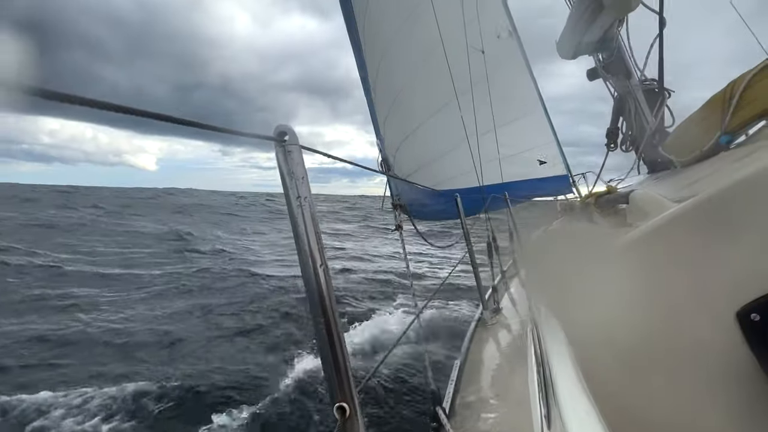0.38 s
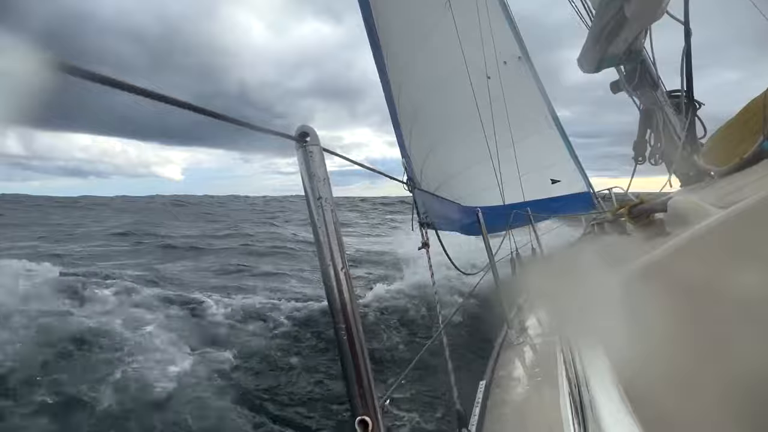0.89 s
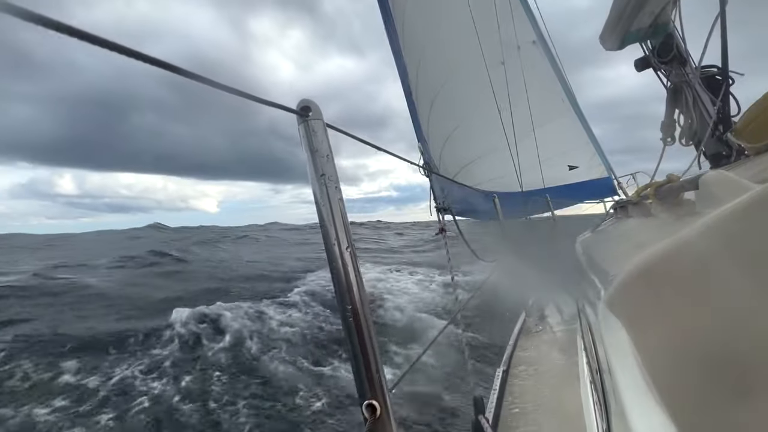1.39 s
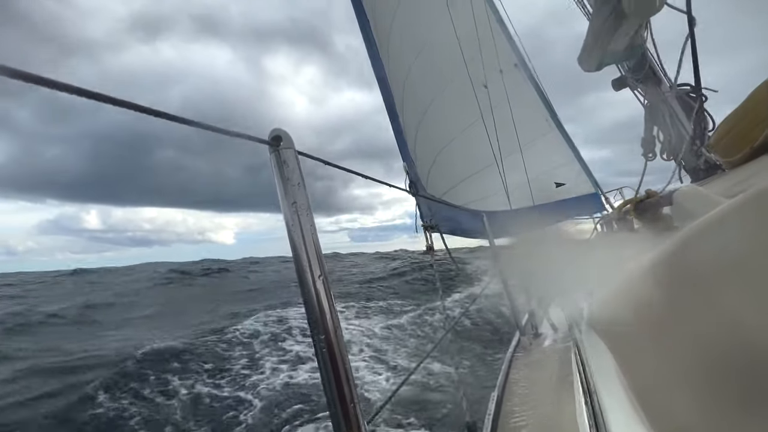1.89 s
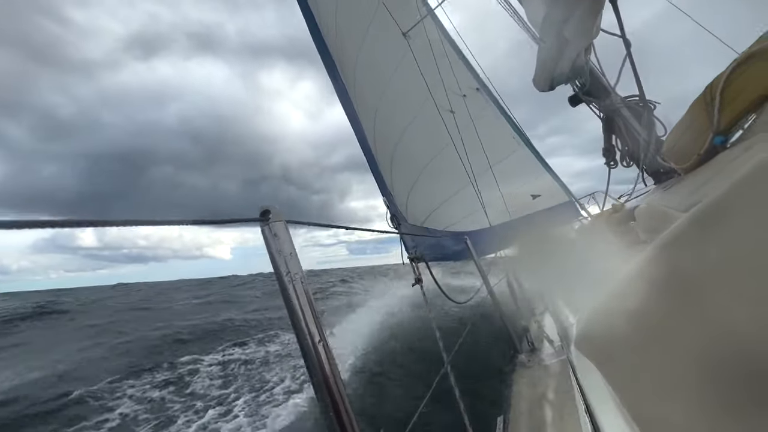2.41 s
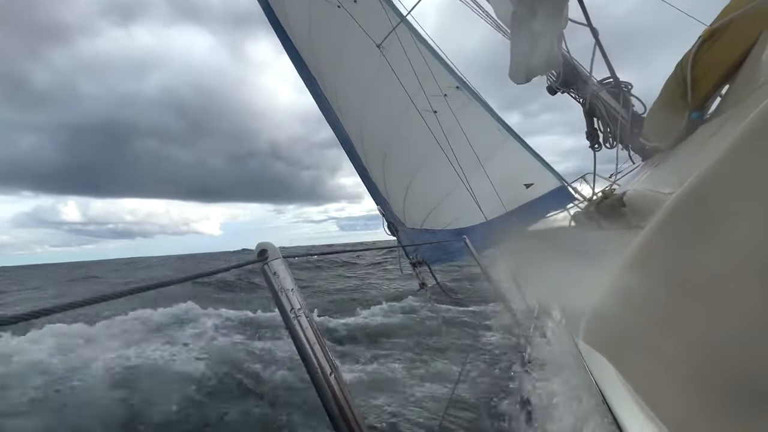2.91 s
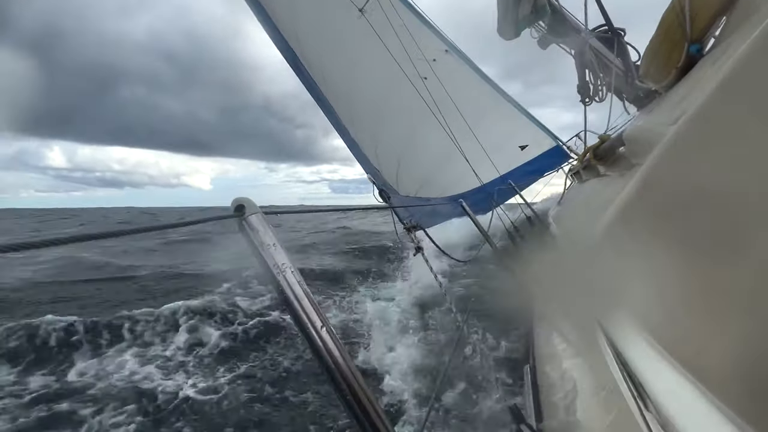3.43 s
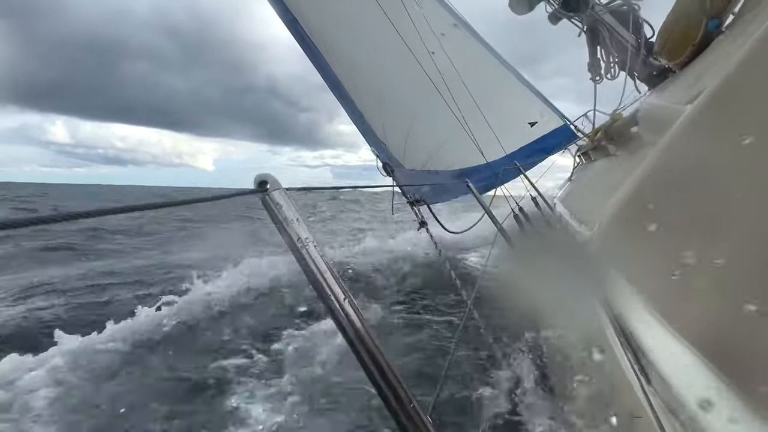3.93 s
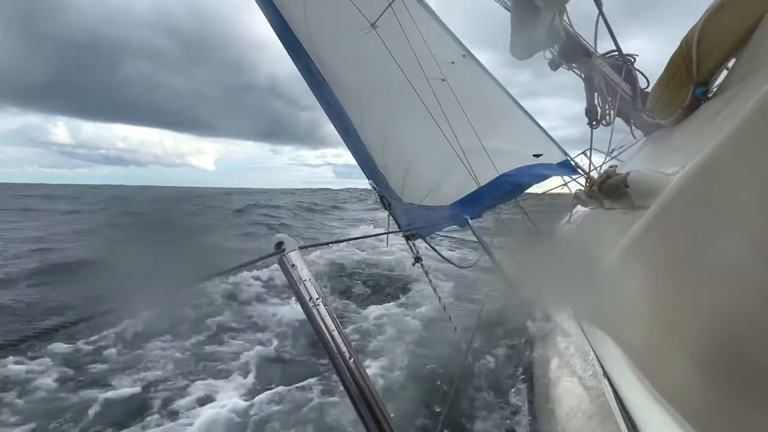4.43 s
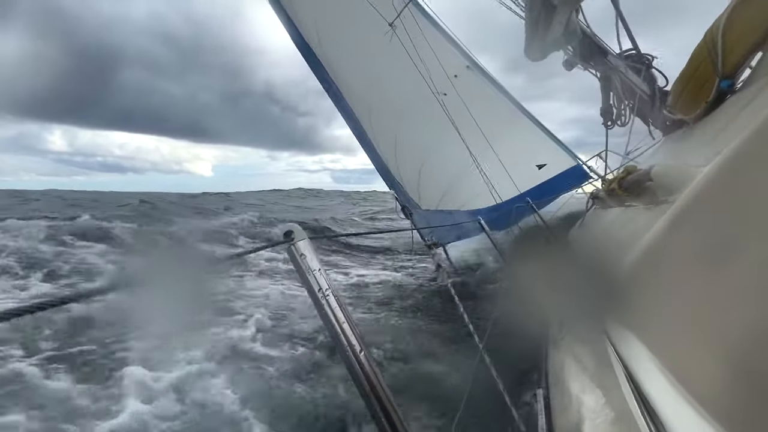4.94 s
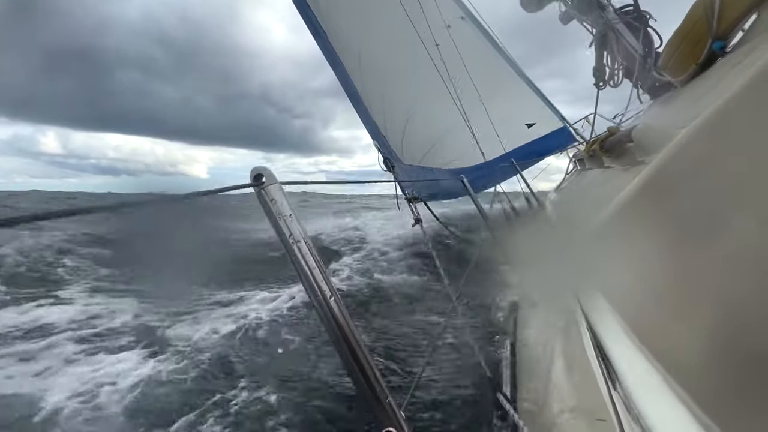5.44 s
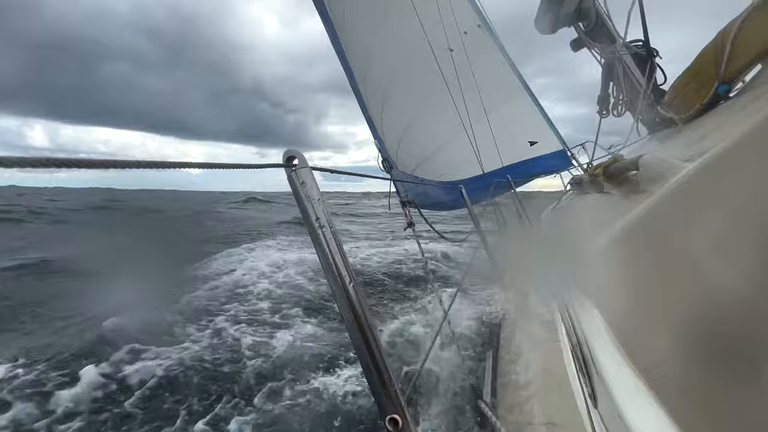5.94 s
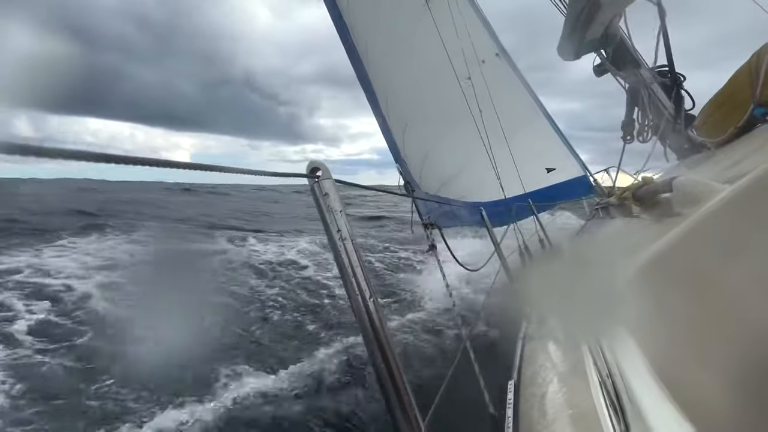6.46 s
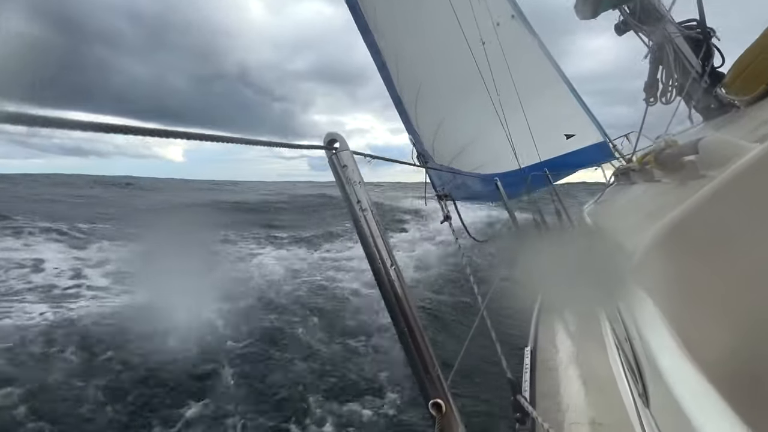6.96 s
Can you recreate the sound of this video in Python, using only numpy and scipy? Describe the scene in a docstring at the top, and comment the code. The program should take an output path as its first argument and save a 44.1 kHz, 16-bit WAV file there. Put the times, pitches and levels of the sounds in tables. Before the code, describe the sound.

A wet stereo microphone sits close at the rail of a small sailboat in rough seas. From 0 s, deep wind booms and flutters in uneven thumps over soft wash, with a couple of faint hollow taps at about 0.2 s. Water gurgles more from 0.7 to 1.3 s, then eases; small ticks and more taps appear near 1.8 s. From 2.4 s the hull wash swells. A tiny high peep at 2.9 s precedes a spatter of spray, knocks and plops at 3.0-3.2 s. Rushing, hissing water peaks at 3.5 s. At 3.8-4.05 s a heavy splash crackles and gulps, then muffles wind and sea until about 4.3 s. Wash returns with a few drops. At 5.2 s a sharp ping starts a thin wavering whistle lasting half a second. The water quiets around 5.6 s, then rushes again under thumping gusts, with light drops near 6.15 s, until 7.1 s.

```python
"""At the rail of a small sailboat heeling through rough seas, a wet microphone with two ports listens close.
Wind noise booms and flutters over the ports; bands of noise and ringing bubbles make the water along the hull.
Spray drops are bursts of dying noise, with a knock of the case and a plop that falls in pitch.
A splash floods the ports for a moment, muffling wind and sea, and wavering tones whistle in a wet port.
Large bubbles gulp as rising tones, and a few hollow taps ring near 2 kHz."""
import sys
import numpy as np
from scipy import signal
from scipy.io import wavfile
from scipy.ndimage import uniform_filter1d, minimum_filter1d

SR = 44100
rng = np.random.default_rng(int(sys.argv[2]) if len(sys.argv) > 2 else 0)


def dump(signal):
    """Clip the signal to [-1, 1] and save it as 16-bit WAV at the path in sys.argv[1]."""
    limited = np.clip(np.atleast_2d(signal).T, -1, 1)
    pcm = np.round(limited * 32767).astype(np.int16)
    wavfile.write(sys.argv[1], SR, pcm)


def volts(x):
    """Linear amplitude factor 10**(x/20) for a level x in dB, scalar or array-like."""
    e = np.asarray(x, float) / 20
    return 10 ** e


N = 312634

# Wind pressure on the ports between heavy eddies. Each row: time in seconds, boom in dB, flutter in dB.
WIND_LEVELS = [(0.0, -18.5, -29), (0.45, -19, -27), (0.9, -23, -27), (1.2, -21, -27), (1.34, -27.5, -32),
               (1.46, -16, -23.5), (2.1, -24.5, -31.5), (2.33, -24, -33.5), (2.5, -14.5, -21),
               (3.0, -21, -28.5), (3.5, -14, -21), (3.68, -19, -26), (3.82, -3, -18.5), (3.86, -13.5, -17),
               (3.93, -21.5, -25.5), (4.5, -17, -23.5), (4.9, -18.5, -24.5), (5.09, -24.5, -29.5),
               (5.22, -12.5, -22), (5.35, -28, -29), (5.5, -21, -26), (5.8, -27, -29.5), (6.4, -24, -27.5),
               (7.09, -15, -23)]
# Heavy eddies thumping the ports. Each row: middle in seconds, boom lift in dB, flutter lift in dB,
# half length in seconds.
WIND_THUMPS = [(0.31, 10, 4.5, 0.031), (0.43, 6, 0.5, 0.14), (0.6, 9.5, -1, 0.04), (0.69, 10.5, 7.5, 0.078),
               (0.79, 6, 2, 0.053), (1.0, 9.5, -1, 0.023), (1.14, 6.5, 6.5, 0.04), (1.23, 8.5, 0, 0.031),
               (1.53, 3.5, 4, 0.031), (1.78, 9.5, 9.5, 0.041), (1.87, 6.5, 1, 0.023),
               (1.95, 10.5, 10, 0.057), (2.07, 7, -2, 0.084), (2.23, 8.5, 10.5, 0.15),
               (2.41, 6, 3.5, 0.078), (2.49, 4.5, 5.5, 0.06), (2.64, 6, 1, 0.057), (2.76, 5, 2, 0.067),
               (2.92, 10.5, 8.5, 0.064), (3.06, 9.5, 3, 0.044), (3.14, 15.5, 18, 0.01), (3.23, 9, 2, 0.059),
               (3.41, 2.5, 5.5, .05), (3.49, 8, 2.5, 0.016), (3.57, 6.5, 6, 0.031), (3.63, 12, 8, 0.041),
               (3.74, -0.5, 10.5, 0.045), (3.99, 2, 5.5, 0.091), (4.36, 6, 6, 0.019),
               (4.46, 10, 3.5, 0.085), (4.69, 16, 10, 0.053), (4.82, 11.5, 9.5, 0.065), (4.88, 9, 9, 0.036),
               (4.98, 10.5, 3.5, 0.089), (5.42, 17.5, 8, 0.06), (5.85, 18.5, 5.5, 0.023),
               (6.03, 11, 5.5, 0.12), (6.2, 16.5, 9, 0.025), (6.29, 8.5, -1.5, .06), (6.65, 11.5, 3, 0.091),
               (6.73, -4, 4.5, 0.025), (6.84, 1, 1, 0.045)]
# Relative noise spectra of the wind. Each row: frequency in Hz, density in dB per Hz.
BOOM_SPECTRUM = [(33, -15), (40, 0), (48, 3), (62, 2.5), (90, -4), (150, -14.5)]
FLUTTER_SPECTRUM = [(110, -7), (140, 1), (200, -3.5), (280, -5.5), (400, -18)]

# Water along the hull. Each row: time in seconds, wash in dB, surge in dB, foam hiss in dB.
SEA_LEVELS = [(0.0, -43.5, -36, -47.5), (0.2, -37.5, -30, -47.5), (0.65, -34, -26.5, -44),
              (0.9, -31.5, -26.5, -38.5), (1.25, -34, -28, -45), (1.4, -37, -34, -42.5),
              (1.51, -41, -34.5, -46), (1.74, -38.5, -38, -47), (2.0, -34.5, -30, -43),
              (2.4, -33.5, -32, -41.5), (2.9, -27, -28, -40), (3.1, -25.5, -26, -36.5),
              (3.25, -24.5, -24.5, -36.5), (3.52, -20, -21, -31.5), (3.68, -25.5, -27.5, -36),
              (3.8, -27, -21, -36), (3.95, -27.5, -28, -42.5), (4.5, -27, -31, -40.5),
              (4.85, -26, -24.5, -36), (5.0, -33, -33, -44), (5.27, -31, -28.5, -40.5),
              (5.58, -37.5, -37.5, -46.5), (5.78, -35.5, -34.5, -48.5), (5.9, -31.5, -33, -42.5),
              (6.5, -28.5, -31, -41.5), (6.82, -34.5, -29, -39.5), (7.09, -30.5, -28.5, -37.5)]
# Waves slopping against the hull. Each row: middle in seconds, wash lift in dB, surge lift in dB,
# half length in seconds.
HULL_SLOPS = [(0.7, 1, 5, 0.13), (1.46, 5, 2, 0.013), (1.81, 4, 6.5, 0.034), (2.21, 5, 4.5, 0.079),
              (2.5, 2, 4.5, 0.31), (2.73, 3.5, 2, 0.022), (3.04, 3.5, 7, 0.025), (3.13, 7, 11.5, 0.018),
              (3.73, 1, 10, 0.035), (3.87, 5.5, 4, 0.1), (3.99, 4, 6.5, 0.038), (4.38, 3.5, 10, 0.1),
              (4.56, -3, 5, 0.16), (4.8, 2, -8, 0.036), (5.86, 3, 6, 0.086), (6.81, 6.5, 4.5, 0.023)]
# Relative noise spectra of the water. Each row: frequency in Hz, density in dB per Hz.
SURGE_SPECTRUM = [(240, -28), (310, -1), (400, -6.5), (550, -3), (750, -7.5), (1100, -21.5)]
WASH_SPECTRUM = [(600, -3), (850, -2.5), (1250, 1.5), (1700, -2), (2100, -8), (2500, -20.5), (3100, -25)]
FOAM_SPECTRUM = [(3000, -21), (4250, -11.5), (4900, 5), (6500, -13), (8500, -10.5), (10500, -39),
                 (12000, -64), (16500, -47)]
FIZZ_SPECTRUM = [(2150, -4), (2700, 3), (3400, 7.5), (3900, 4), (4400, -12)]
# Fizz of small bubbles, sinking during the flood. Each row: time in seconds, level in dB.
FIZZ_LEVELS = [(0.0, -61), (0.31, -51), (0.47, -46.5), (0.81, -41), (0.93, -42.5), (1.56, -50.5),
               (1.74, -52.5), (1.89, -49), (2.31, -46.5), (2.9, -40.5), (3.28, -36.5), (3.55, -36),
               (3.8, -35.5), (3.95, -37), (4.08, -59), (4.26, -47), (4.44, -41.5), (4.78, -39.5),
               (4.93, -44), (5.27, -47), (5.47, -49.5), (5.82, -49), (6.02, -43.5), (6.38, -46.5),
               (6.61, -41), (7.09, -41.5)]
# Large bubbles gulping in the wash. Each row: start in seconds, level in dB, starting pitch in Hz.
BUBBLE_GULPS = [(0.68, -17, 563), (1.249, -13, 574), (1.454, -21, 1400), (1.567, -23, 480),
                (1.648, -27, 850), (1.682, -26, 1380), (3.035, -9, 1280), (3.046, -12, 756),
                (3.441, -11, 1210), (3.595, -13, 660), (3.727, -14, 804), (3.89, 4.5, 351),
                (3.905, -8, 397), (3.906, -12, 1010), (3.967, -14, 780), (4.012, -6, 497),
                (4.655, -19, 360), (4.946, -22, 371), (5.475, -27, 355), (5.967, -13, 335),
                (6.468, -15, 950)]

# Spray striking the case. Each row: start in seconds, tick level in dB, knock level in dB, plop level in dB,
# treble slope in dB per octave, left over right in dB.
SPRAY_DROPS = [(1.2407, -44, -20, -26, -14, -6), (2.7227, -40, -30, -16, -15, -14),
               (2.9958, -11, -12, -9, -17, 3), (3.0242, -21, -18, -31, -4.5, 17.5),
               (3.035, -36, -10, -24, -20, 0), (3.0785, -26, -11, -20, -14, 0),
               (3.089, -26, -9.5, -12, -6, 1), (3.102, -26, -12, -18, -14, 3),
               (3.106, -25, -9.5, -14, -9, -1), (3.1119, -26, -14, -6, -19, 9),
               (3.1281, -10, -3, -6, -25, 1), (3.137, -29, -14, -0.5, -18, -6),
               (3.19, -23, -26, -19, -8, 6), (3.6636, -20, -14, 3, -13, -11),
               (3.726, -21, -23, -14, -7, -2), (3.827, -17, -8, -12, -6.5, 0),
               (3.8405, -18, -10, -26, -5, 1), (3.849, -11, -13, -15, -18, 0),
               (3.854, -16, -9, -15, -4, 6.5), (3.871, -14.5, -10, -24, -9, 7),
               (3.881, -18, -11, -22, -7, -6), (3.877, -20, -9, -9, -11, 0),
               (3.89, -32, -9, -4.5, -10, -10), (3.8941, -24, -12, -2.5, -7, 5),
               (3.904, -15, -1, -12, -3, 6), (3.9085, -21, -7, -3.5, -4.5, 11),
               (3.9162, -7, -10, 2.5, -20, -9), (3.93, -24, -9.5, -10, -14, 14),
               (3.9352, -22, -21, -5.5, -14, -8), (3.9442, -26, -23, -6, -13, 4),
               (3.9516, -14, -9, 6, -18, -9), (3.978, -26.5, -22, -15, -4, 16),
               (3.9903, -19, -8.5, -18, -17, -10), (3.998, -30, -17, -10, -8, 9),
               (4.017, -16, -13, -18, -12, 0), (4.0195, -20.5, -16, -11, -2, 9.5),
               (4.034, -11, -1.5, 5, -27, 10.5), (4.065, -21, -18, -6, -25, -1),
               (4.359, -33, -25, -20, -2, 0), (4.38, -17.5, -22, -24, -8, 14),
               (4.404, -29, -14, -8, -12, 4), (4.668, -23, -31, -12, -7, 3),
               (6.138, -31, -15.5, -34, -12, -7), (6.174, -28, -23, -32, -10, -1)]
# Hollow tick, crack and fine spray of a drop. Each row: low edge in Hz, high edge in Hz.
SPRAY_BANDS = [(1500, 2000), (2600, 4500), (7000, 13000)]
# Showers of fine droplets on the case. Each row: start in seconds, length in seconds, droplets per second,
# base level in dB.
DROPLET_SHOWERS = [(2.982, 0.19, 900, -22.5), (3.217, 0.6, 500, -26.5), (3.826, 0.17, 2200, -20.5),
                   (4.322, 0.092, 190, -16), (3.078, 0.07, 1600, -20), (3.87, 0.02, 4000, -18),
                   (3.997, .025, 900, -21)]
# Pitch factors of low, middle and high plops.
PLOP_PITCH_FACTORS = [.87, 1, 1.15]

# Tones of air in a wet port. Each row: time in seconds, pitch in Hz, level in dB.
MAIN_WHISTLE = [(5.16, 5540, -60), (5.2, 5600, -39), (5.26, 5720, -40), (5.31, 5850, -36),
                (5.38, 5940, -35.5), (5.43, 5830, -34), (5.47, 5720, -42), (5.52, 5680, -41),
                (5.555, 5350, -33), (5.6, 5360, -49), (5.635, 5020, -47), (5.66, 5100, -56)]
LOW_WHISTLE = [(5.2, 4650, -56), (5.26, 4750, -49), (5.33, 4700, -44), (5.37, 4860, -40),
               (5.405, 5050, -42), (5.42, 4760, -52), (5.445, 4680, -43), (5.52, 4620, -48),
               (5.55, 4700, -55), (5.59, 4820, -45), (5.63, 4760, -54), (5.67, 4700, -51),
               (5.72, 4700, -56), (5.76, 4650, -58)]
MIDDLE_WHISTLE = [(5.16, 5400, -52), (5.23, 5480, -49), (5.37, 5450, -47), (5.5, 5600, -43),
                  (5.55, 5500, -49)]
EARLY_PEEP = [(2.885, 5450, -51), (2.9, 5480, -43), (2.935, 5480, -39), (2.941, 5500, -31),
              (2.96, 5500, -39), (2.98, 5550, -41)]  # an earlier, short whistle
# The main whistle and its side tones: pitch as a ratio to the main pitch, then level in dB beside it.
TONE_RATIOS = [1, 1.075, 1.04, .955, .88]
TONE_LEVELS = [0, -11, -10, -11, -12]
# Drops right in the left port. Each row: start in seconds, peak in dB.
PORT_DROPS = [(1.382, -25), (1.528, -30), (1.688, -27), (2.033, -21), (2.262, -18), (5.206, -4)]
# Hollow taps, perhaps a line knocking on the rigging. Each row: start in seconds, level in dB, pitch in Hz.
HOLLOW_TAPS = [(0.1488, -21, 2030), (0.2398, -22, 2070), (1.7988, -24.5, 2250), (1.816, -19.5, 2050),
               (1.9054, -22, 2300)]

# Treble peaks of the port cavities. Each row: frequency in Hz, width in Hz, height in dB.
LEFT_PORT_PEAKS = [(5500, 1700, 14.5)]
RIGHT_PORT_PEAKS = [(5330, 7000, 10.1), (9600, 1800, 5.7)]
# How much noise power both ports share. Each row: frequency in Hz, share from 0 to 1.
PORT_LIKENESS = [(300, 0.76), (800, 0.56), (1500, 0.2), (3000, 0.025), (6000, 0.039), (10000, 0.23),
                 (13000, 0.93)]
# Corner below which both sides are alike. Each row: time in seconds, corner in Hz.
MONO_CORNER = [(0, 706), (.6, 653), (1.2, 495), (1.6, 354), (2.2, 333), (4, 320), (4.3, 390), (7.09, 394)]


def rms_one(x):
    """Scales a signal to an rms of 1."""
    return x / np.sqrt(np.mean(x ** 2) + 1e-20)


def in_time(rows):
    """Draws each column of a table as a curve of straight lines over time."""
    s, *columns = np.transpose(rows)
    return [np.interp(np.arange(N) / SR, s, column) for column in columns]


def at_hz(points, hz):
    """Reads a table at a frequency, along a logarithmic frequency axis."""
    table = np.array(points)
    return np.interp(np.log(hz), np.log(table[:, 0]), table[:, 1])


def lifts(rows):
    """Each row swells and sinks as a bell; gives one dB curve per level column."""
    out = np.zeros((len(rows[0]) - 2, N))
    for s, *db, half_s in rows:
        half = max(int(half_s * SR), 10)
        start, end = max(round(s * SR) - half, 0), min(round(s * SR) + half, N)
        at = np.arange(start, end)
        bell = np.cos((at - s * SR) / half * np.pi / 2) ** 2
        out[:, at] += np.outer(db, bell)
    return out


def drift(rate_hz):
    """Slow chance: noise through a double one-pole low-pass at rate_hz, spread 1."""
    step = 20  # computed at every 20th sample, then interpolated
    r = np.exp(-2 * np.pi * rate_hz * step / SR)
    noise = rng.standard_normal(N // step + 2002)
    slow = signal.lfilter([1], [1, -2 * r, r * r], noise)[2000:]  # the filter has settled by then
    return np.interp(np.arange(N) / step, np.arange(len(slow)), rms_one(slow))


def resonance(x, hz, width_hz):
    """Two-pole band-pass with gain 1 on top."""
    r = np.exp(-np.pi * width_hz / SR)
    zeros = np.array([1, 0, -1]) * (1 - r * r) / 2
    poles = [1, -2 * r * np.cos(2 * np.pi * hz / SR), r * r]
    return signal.lfilter(zeros, poles, x + 1e-18)


def ports(x):
    """Each port is a small cavity with its own treble peaks."""
    out = []
    for side, peaks in zip(x, (LEFT_PORT_PEAKS, RIGHT_PORT_PEAKS)):
        for hz, width_hz, db in peaks:
            side = side + (volts(db) - 1) * resonance(side, hz, width_hz)
        out.append(side)
    return np.array(out)


def turbulence(spectrum, lumps_db, patchy_db, grain_share, grains_per_s):
    """Third-octave bands of noise and sharp grains; all share the lumps, each flickers on its own."""
    shape = (2, 2, N)
    sizes = volts(4.34 * np.minimum(rng.exponential(1, shape), 5)) * rng.choice([-1, 1], shape)
    grains = rms_one(sizes * (rng.random(shape) < grains_per_s / SR))
    share = np.clip(grain_share, 0, 1)
    white = np.sqrt(1 - share) * rng.standard_normal(shape) + np.sqrt(share) * grains
    lowest, highest = spectrum[0][0], spectrum[-1][0]
    edges = lowest * 2 ** (np.arange(int(3 * np.log2(highest / lowest)) + 1) / 3)
    out = 0
    for k, (low, high) in enumerate(zip(edges, edges[1:])):
        band = signal.butter(2, [low, high], "band", fs=SR, output="sos")
        mid, side = signal.sosfilt(band, white[k % 2])  # neighbouring bands use separate noise
        hz = np.sqrt(low * high)
        alike = np.clip(at_hz(PORT_LIKENESS, hz), 0, 1)
        own = np.array([side, np.roll(side, N // 2)])
        mixed = np.sqrt(alike) * mid + np.sqrt(1 - alike) * own
        flicker = drift(16.0) + 0.41 * drift(3.26)
        out = out + volts(at_hz(spectrum, hz) + patchy_db * flicker) * mixed
    return out * volts(lumps_db)


def wind():
    """Eddies tumbling over the ports: a low boom in heavy lumps, with a faster flutter above it."""
    boom_db, flutter_db = in_time(WIND_LEVELS) + lifts(WIND_THUMPS)
    eddies = drift(37.7)
    boom = turbulence(BOOM_SPECTRUM, 2.25 * eddies, patchy_db=1.5, grain_share=0.17, grains_per_s=84)[0]
    # the gusts set the strength, so the noise's own slow swell is mostly evened out
    swell = uniform_filter1d(boom ** 2, size=1800) + 0.034 * np.mean(boom ** 2)
    boom = rms_one(boom / swell ** 0.39)
    flutter = turbulence(FLUTTER_SPECTRUM, 1.77 * eddies, patchy_db=0.5, grain_share=0.25, grains_per_s=130)
    return volts(boom_db) * boom + volts(flutter_db) * rms_one(flutter)


def sea():
    """Surge, wash and foam of the bow wave; slops in the flow shake all three together."""
    wash_db, surge_db, foam_db = in_time(SEA_LEVELS)
    wash_lift, surge_lift = lifts(HULL_SLOPS)
    foam_lift = 0.53 * wash_lift
    slop, chop = drift(22.0), drift(71)
    surge = turbulence(SURGE_SPECTRUM, 1.2 * slop + 1.2 * chop, patchy_db=2.0, grain_share=0.38, grains_per_s=280)
    wash = turbulence(WASH_SPECTRUM, 0.27 * slop + 1.03 * chop, patchy_db=2.5, grain_share=0.23, grains_per_s=540)
    foam = turbulence(FOAM_SPECTRUM, 0.5 * slop + 1.05 * chop, patchy_db=1.2, grain_share=0.27, grains_per_s=1700)
    # surge and wash lean slightly to the right
    surge = rms_one(surge) * volts([[-1.3], [1.3]])
    wash = rms_one(wash) * volts([[-0.4], [0.4]]) + volts(-6.5) * gurgle(per_s=300)
    foam = rms_one(ports(foam))
    return volts(surge_db + surge_lift) * surge + volts(wash_db + wash_lift) * wash + volts(foam_db + foam_lift) * foam


def gurgle(per_s):
    """Bubbles burst at random and ring a few cycles, at pitches spread over three octaves."""
    sizes = volts(3.36 * np.minimum(rng.exponential(1, N), 3.0)) * rng.choice([-1, 1], N)
    born = rng.random(N) < per_s * volts(4 * drift(8)) / SR
    pitches, dealt = np.geomspace(420, 3400, 16), rng.integers(0, 16, N)
    out = 0
    for k, hz in enumerate(pitches):
        bursts = sizes * born * (dealt == k)
        ring = resonance(resonance(bursts, hz, hz / 13.7), hz, hz)
        out = out + rms_one(ring) * volts(at_hz(WASH_SPECTRUM, hz) * 1.29) * np.sqrt(hz)
    return rms_one(out)


def flood(depth_db):
    """Gain while water covers the ports: it closes fast, holds, and drains."""
    start_s, close_s, hold_s, drain_s = 4.02, 0.055, 0.081, 0.15
    s = start_s + np.cumsum([0, close_s, hold_s, drain_s])
    return volts(np.interp(np.arange(N) / SR, s, [0, depth_db, depth_db, 0]))


def spray():
    """Each drop is a burst of dying noise (hollow tick, crack, fine spray); droplets crackle in showers."""
    out, t = np.zeros((2, N)), np.arange(600) / SR
    bands = [signal.butter(2, edges, "band", fs=SR, output="sos") for edges in SPRAY_BANDS]
    octaves = np.log2(np.mean(SPRAY_BANDS, axis=1) / np.mean(SPRAY_BANDS[0]))
    leans_db = [0, 8, 0]  # the left port hears more of the crack
    for s, tick_db, _, _, slope_db, pan_db in SPRAY_DROPS:
        i = round(s * SR)
        burst = rng.standard_normal(600) * np.exp(-t / 0.0004)
        for octave, lean_db, band in zip(octaves, leans_db, bands):
            part = signal.sosfilt(band, burst)
            sides_db = (pan_db + lean_db) * np.array([[0.5], [-0.5]])
            out[:, i:i + 600] += part / np.abs(part).max() * volts(tick_db + slope_db * octave + sides_db)
    return ports(out + showers())


def showers():
    """Fine droplets fall at random: short clicks of widely spread sizes, band-passed by the case."""
    per_s, level = np.zeros((2, N))
    for s, length_s, rate, db in DROPLET_SHOWERS:
        span = slice(round(s * SR), round((s + length_s) * SR))
        per_s[span], level[span] = rate, volts(db)
    spread_db = 4.5 * np.minimum(rng.exponential(1, N), 3)
    sizes = level * volts(spread_db + 5.5 * rng.standard_normal((2, N)))  # each side varies on its own
    droplets = sizes * rng.choice([-1, 1], N) * (rng.random(N) < per_s / SR)
    case = signal.butter(3, [700, 2800], "band", fs=SR, output="sos")
    return signal.sosfilt(case, droplets) + volts(-38) * droplets


def blows():
    """Under each drop the case knocks, and the water plops with a falling pitch, low, middle or high at random."""
    count = len(PLOP_PITCH_FACTORS)
    knocks, plops, t = np.zeros((2, N)), np.zeros((count, 2, N)), np.arange(900) / SR
    dealt = rng.integers(0, count, len(SPRAY_DROPS))
    for kind, (s, _, knock_db, plop_db, _, pan_db) in zip(dealt, SPRAY_DROPS):
        i, sides_db = round(s * SR), pan_db * np.array([0.5, -0.5])
        knocks[:, i] += volts(knock_db + sides_db)
        plops[kind, :, i] += volts(plop_db + 0.5 * sides_db)
    knock_hz, width_hz = 1280, 740
    knock = resonance(resonance(t == 0, knock_hz, width_hz), knock_hz, 2 * width_hz)
    # pitch and decay of a middle plop; a lower one is slower to die
    start_hz, end_hz, fall_s, decay_s = 850, 170, 0.0016, 0.0017
    hz = end_hz + (start_hz - end_hz) * np.exp(-t / fall_s)
    pairs = [(knocks, knock)]
    for hits, factor in zip(plops, PLOP_PITCH_FACTORS):
        tone = np.sin(2 * np.pi * np.cumsum(factor * hz) / SR)
        pairs.append((hits, tone * t * np.exp(-factor * t / decay_s)))
    return sum(signal.fftconvolve(hits, shape[None] / np.abs(shape).max())[:, :N] for hits, shape in pairs)


def gulps():
    """Each large bubble swells fast, rings a few cycles and rises a little in pitch."""
    out, t = np.zeros(N), np.arange(2000) / SR
    for s, db, hz in BUBBLE_GULPS:
        age = t * hz / 3.6  # 1 after 3.6 cycles at the starting pitch
        tone = np.sin(2 * np.pi * np.cumsum(hz * (1 + 0.15 * age)) / SR)
        i = round(s * SR)
        out[i:i + 2000] += volts(db) * tone * (1 - np.exp(-6.0 * age)) * np.exp(-age ** 2)
    return out


def wet_port():
    """Drops ping the left cavity; air sings past the film of water in a few ragged tones."""
    song = strand(LOW_WHISTLE, 1, 0) + strand(MIDDLE_WHISTLE, 1, 0) + strand(EARLY_PEEP, 0.98, 0)
    for ratio, db in zip(TONE_RATIOS, TONE_LEVELS):
        song = song + strand(MAIN_WHISTLE, ratio, db)
    click, clicks = np.arange(600) == 0, np.zeros(N)
    for s, db in PORT_DROPS:
        clicks[round(s * SR)] = volts(db)
    ping = resonance(resonance(resonance(click, 5900, 1100), 5700, 2200), 5600, 2600)
    pings = np.convolve(clicks, ping / np.abs(ping).max())[:N]
    return song * volts([[4], [-3]]) + pings * volts([[0], [-22]])


def strand(rows, ratio, db):
    """One ragged tone: the pitch wavers and the tone breaks into short pieces."""
    hz, level_db = in_time(rows)
    sounding = np.interp(np.arange(N) / SR, [rows[0][0], rows[-1][0]], [1, 1], left=0, right=0)
    wavering_hz = ratio * hz * (1 + 0.005 * drift(50))
    tone = np.sin(2 * np.pi * np.cumsum(wavering_hz) / SR)
    return tone * sounding * volts(level_db + db) * (0.8 + 0.75 * drift(75))


def taps():
    """Each tap rings briefly near 2 kHz, with a thin bright edge."""
    out, click = np.zeros(N), np.arange(800) == 0
    width_hz, edge_db = 280, -5
    edge = resonance(click, 5500, 1500)
    for s, db, hz in HOLLOW_TAPS:
        body = resonance(resonance(click, hz, width_hz), hz, 2 * width_hz)
        i = round(s * SR)
        out[i:i + 800] += volts(db) * (body / np.abs(body).max() + volts(edge_db) * edge / edge.max())
    return out


def fizz():
    """Small bubbles bursting in the wake, above the wash: grainy noise in a band around 3 kHz."""
    bubbles = turbulence(FIZZ_SPECTRUM, 1.6 * drift(36), patchy_db=2.5, grain_share=0.36, grains_per_s=920)
    return volts(in_time(FIZZ_LEVELS)[0]) * rms_one(bubbles)


def scene():
    """All that reaches the two ports; the flood gain muffles wind and sea, the fizz sinks by its own levels."""
    weather = flood(depth_db=-15.5) * wind() + flood(depth_db=-14) * sea()
    return weather + spray() + blows() + gulps() + wet_port() + taps() + fizz()


def smear(x, hz, damping, count):
    """All-pass sections delay the sound below hz, so a click falls in pitch."""
    w = 2 * np.pi * hz / SR
    a = damping * np.sin(w)
    section = np.array([1 - a, -2 * np.cos(w), 1 + a, 1 + a, -2 * np.cos(w), 1 - a]) / (1 + a)
    return signal.sosfilt(np.tile(section, (count, 1)), x)


def fold_bass(pair):
    """A steep crossover: below the moving corner both sides carry the same average."""
    corner, out = in_time(MONO_CORNER)[0], []
    low_state, high_state = np.zeros((4, 2)), np.zeros((4, 2, 2))
    for i in range(0, N, 2048):
        block = pair[:, i:i + 2048]
        lows = np.tile(signal.butter(3, corner[i], "low", fs=SR, output="sos"), (2, 1))
        highs = np.tile(signal.butter(3, corner[i], "high", fs=SR, output="sos"), (2, 1))
        low, low_state = signal.sosfilt(lows, block.mean(axis=0), zi=low_state)
        high, high_state = signal.sosfilt(highs, block, zi=high_state)
        out.append(low - high)  # the minus brings the two halves in phase at the corner
    return np.concatenate(out, axis=1)


def limiter(x, top):
    """Looks a few ms ahead and eases the gain down around peaks."""
    room = np.minimum(1, top / (np.abs(x).max(axis=0) + 1e-9))
    return x * uniform_filter1d(minimum_filter1d(room, size=401), size=200)


def band_limit(x):
    """A steep low-pass at the top of the band."""
    return signal.sosfilt(signal.butter(12, 17110, fs=SR, output="sos"), x)


def record(dry):
    """The left port lags in the middle range and leads in the treble; bass is folded to mono, peaks limited."""
    left = smear(dry[0], 1800, damping=0.7, count=5)
    right = np.roll(dry[1], 24)  # samples, about half a millisecond
    mix = limiter(fold_bass(np.array([left, right])), top=0.94)
    return band_limit(mix)


dry = scene()
out = record(dry)
dump(out)
```